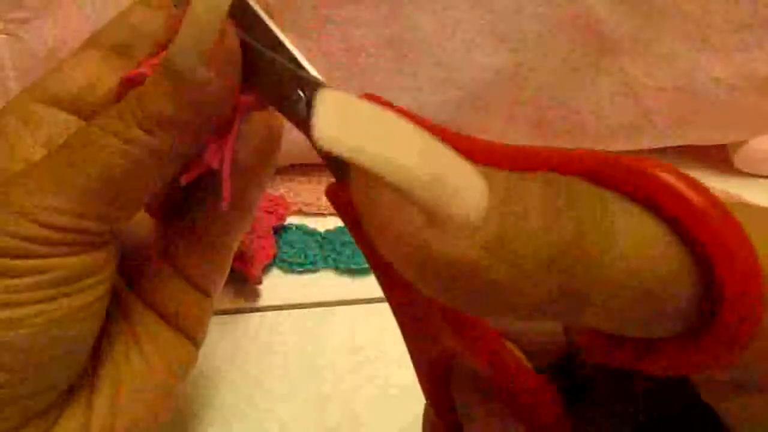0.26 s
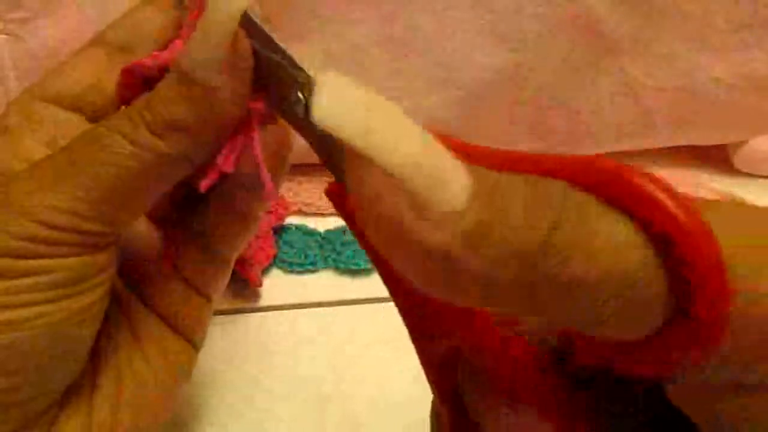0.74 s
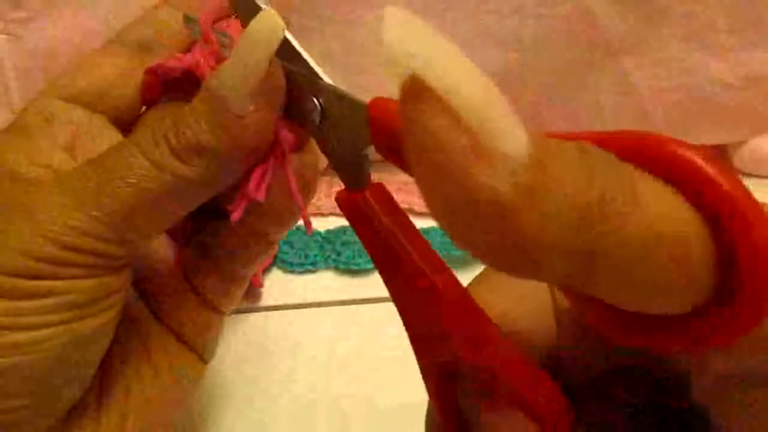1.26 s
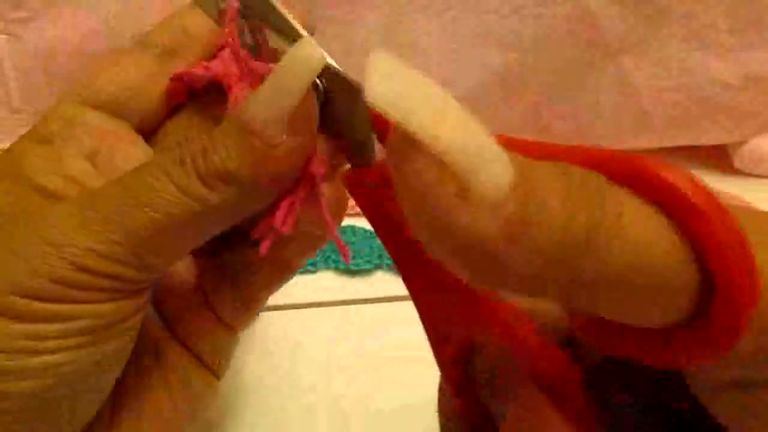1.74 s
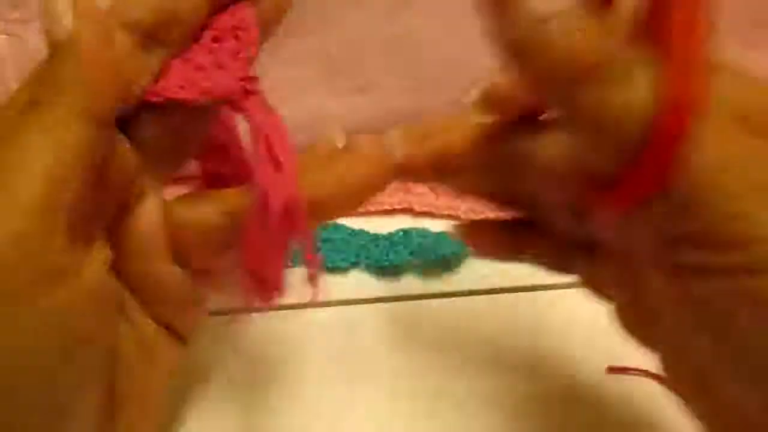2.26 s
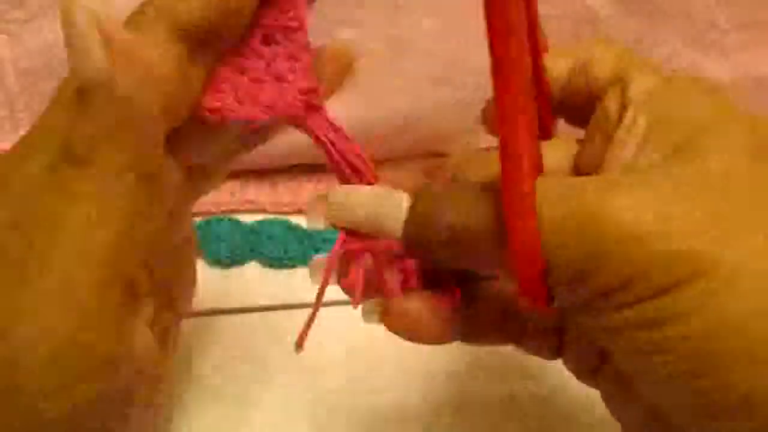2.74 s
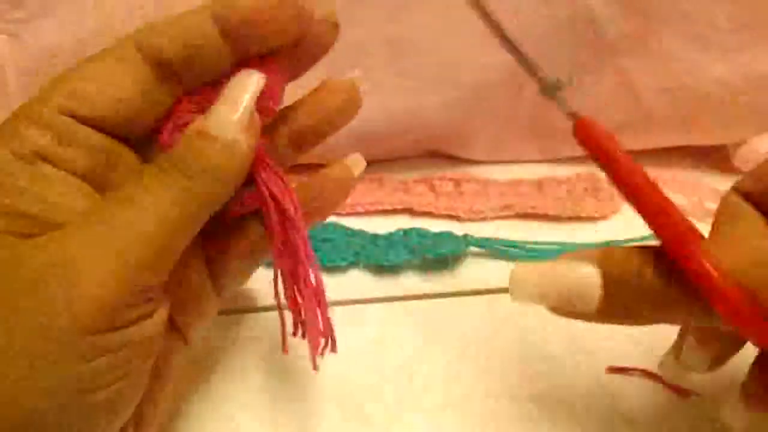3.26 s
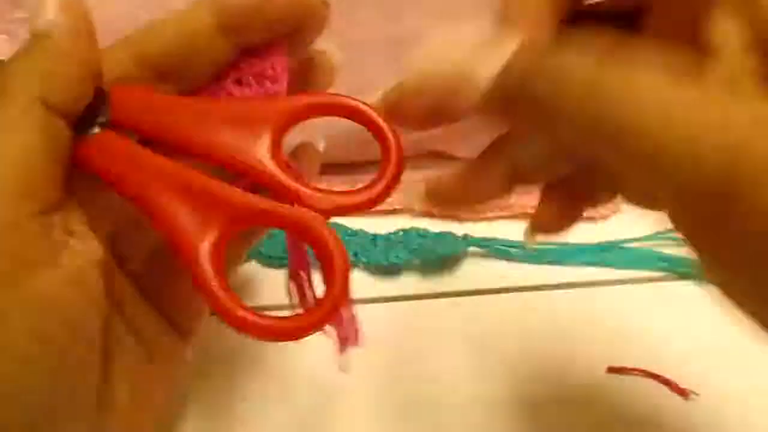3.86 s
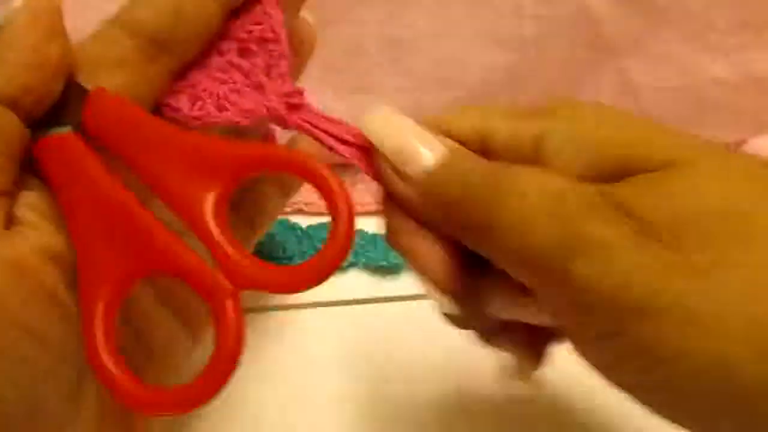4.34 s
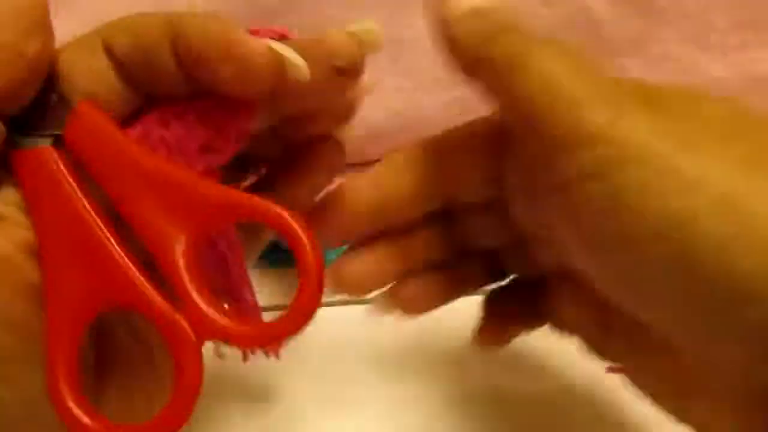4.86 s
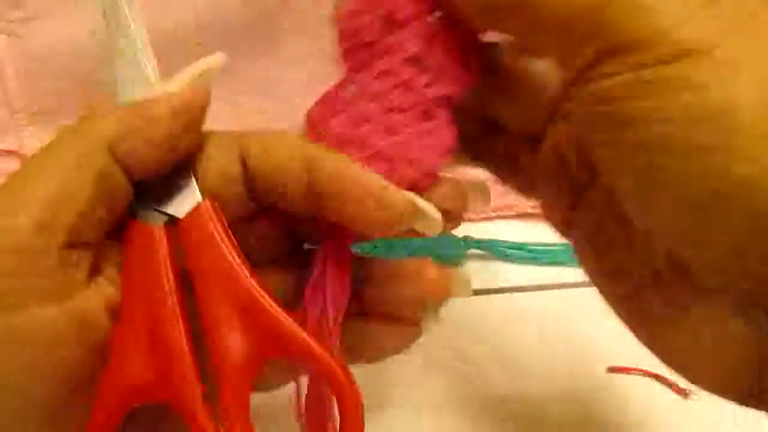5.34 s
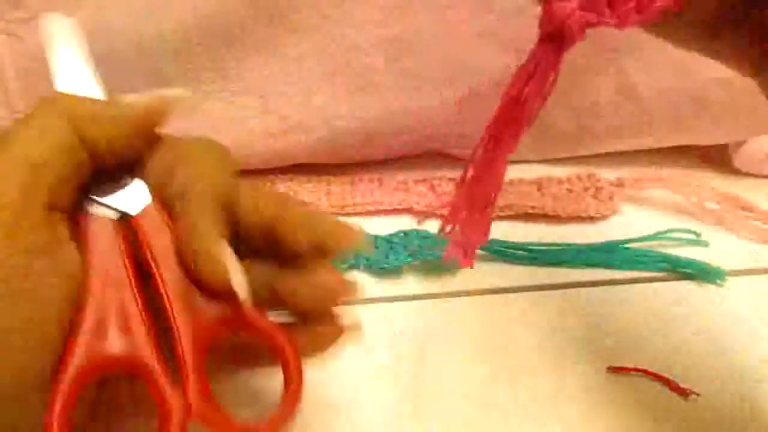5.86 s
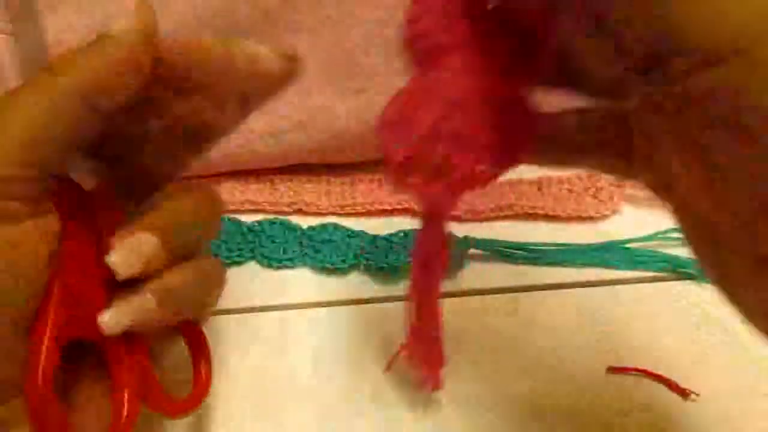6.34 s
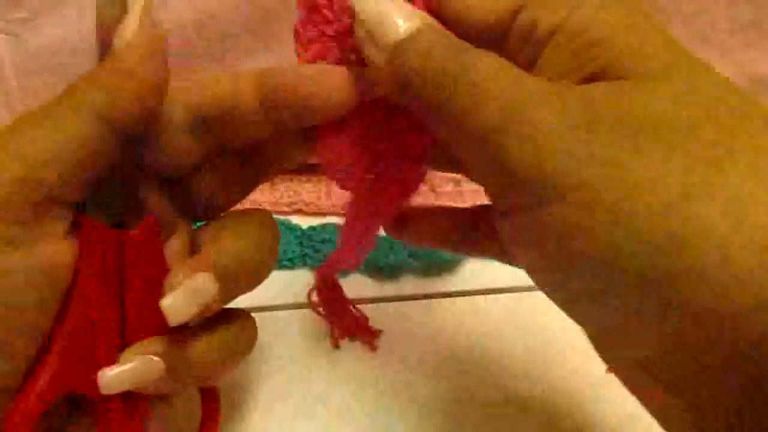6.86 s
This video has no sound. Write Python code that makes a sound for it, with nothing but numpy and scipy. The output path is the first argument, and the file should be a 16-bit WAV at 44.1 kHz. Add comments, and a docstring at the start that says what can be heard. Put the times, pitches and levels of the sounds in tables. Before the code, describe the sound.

A quiet, dry room with steady faint fan rumble, heard close in mono. A tiny nail tick on plastic comes at 0.2 s, faint scissor clicks at 0.4 and 0.6, and a very soft rasp near 0.8. A clear metallic click at 1.2 skids briefly; crisp, grainy snips through yarn follow at 1.4-1.6 and 1.8-1.95. Soft table bumps come around 1.9-2.25, faint tiny clicks at 2.6-2.9, and a light yarn rustle at 3.0. A dull thump at 3.4 leads to the loudest event, a sharp clack with a thud at 3.5, then clicks at 3.6 and another bright one at 4.0. Yarn swishes through fingers at 4.5-4.75, tightening, ending in a small click. Low thuds fall at 5.0 and 5.45, with faint rustling until 5.9. A low drone grows from about 5.6-6.2, and a last soft bump sounds at 6.7 before the hum continues to 7.1.

```python
"""A fan rumbles and whines faintly in a quiet room: steady noise, resonances and a low drone that swells late.
A fingernail taps a plastic handle and yarn slides between the fingers: ringing modes, and many tiny slips.
Small scissors click as they change hands, trim a yarn tassel with a rasp, and skid after hard contacts:
damped metal modes, and fibres snapping at random. Hands bump the table, which swings in its low modes."""
import sys
import numpy as np
from scipy import signal
from scipy.fft import rfft, irfft, next_fast_len
from scipy.io import wavfile

SR = 44100
rng = np.random.default_rng(int(sys.argv[2]) if len(sys.argv) > 2 else 0)


def wrap_up_sound(samples):
    """Save the sound to the file named by the first command line argument, as 16-bit audio."""
    columns = np.atleast_2d(samples).T
    # keep every value between -1 and 1, then stretch to whole-number steps
    tamed = np.clip(columns, -1, 1)
    steps = np.round(tamed * 32767).astype(np.int16)
    wavfile.write(sys.argv[1], SR, steps)


N = 313551
TIME = np.arange(N) / SR


def amp(db):
    """Turn decibels into a gain."""
    return 10 ** (np.asarray(db) / 20)


def unit(x):
    """Scale a sound to an average strength (rms) of 1."""
    return x / np.sqrt(np.mean(x ** 2) + 1e-20)


def filtered(x, response):
    """Make each frequency stronger or weaker by the gain that response gives for it."""
    m = next_fast_len(N + SR // 2)  # spare room, so the end does not wrap round to the start
    spectrum = rfft(x, m) * response(np.fft.rfftfreq(m, 1 / SR))
    return irfft(spectrum, m)[:N]


def coloured(x, points):
    """Shape a sound by (f/Hz, level/dB) points joined on a log frequency axis, at rms 1."""
    f, db = np.transpose(points)
    return unit(filtered(x, lambda hz: amp(np.interp(np.log(hz + 1), np.log(f), db))))


def narrow(centre_hz, width_hz):
    """Noise gathered round one resonance, at rms 1."""
    def response(hz):
        return 1 / (1 + ((hz - centre_hz) / width_hz * np.sqrt(2)) ** 2)
    return unit(filtered(rng.standard_normal(N), response))


def fibres(rate, spread_db):
    """Tiny slips at random moments, about rate a second, of uneven size and either direction."""
    happens = rng.random(N) < rate / SR
    direction = rng.choice([-1, 1], N)
    return happens * direction * amp(spread_db * rng.standard_normal(N))


def add(track, s, sound):
    """Mix a sound into the track at time s."""
    part = track[max(0, round(s * SR)):][:len(sound)]
    part += sound[:len(part)]


def swell(start, length, rise, fall):
    """Gain of one hand movement: it gathers speed smoothly, holds and lets go."""
    ramp = np.clip(np.minimum((TIME - start) / rise, (start + length - TIME) / fall), 0, 1)
    return np.sin(np.pi / 2 * ramp)


def struck(modes, tuning, attack, scatter_db):
    """Modes ring and die away after a hard contact; the whole is scaled to a fixed energy."""
    t = np.arange(SR // 25) / SR
    ring = np.zeros(len(t))
    for k, (hz, db, t60) in enumerate(modes):
        level_db = db + scatter_db * rng.standard_normal()
        fading = amp(level_db - 60 * t / t60)
        # neighbouring modes swing in opposite senses
        ring += (-1) ** k * fading * np.sin(2 * np.pi * hz * tuning * t)
    ring *= 1 - np.exp(-t / attack)
    return ring / np.sqrt(np.sum(ring ** 2) / (SR / 2000))  # same energy as 0.5 ms at rms 1


# colour of the room's steady noise: (f/Hz, relative level/dB per Hz)
ROOM_COLOUR = [(12, -35), (20, -5), (54, -11.5), (88, 1.5), (123, -4.5), (217, -8.5), (282, -7.5),
               (449, -17), (630, -19.5), (1110, -20.5), (1240, -23.5), (1560, -20.5), (1730, -25.5),
               (6840, -32.5), (9840, -41.5), (12800, -94), (21600, -120)]
# the fan's resonances: (f/Hz, width/Hz, level/dB rms)
FAN_RESONANCES = [(99, 23, -63.5), (286, 60, -66.5), (1067, 246, -69), (1547, 92, -65)]
# a low drone swelling: (t/s, level/dB)
DRONE_LEVEL = [(0, -82), (5.6, -69), (6.2, -55), (7.11, -54.5)]
ROOM_DB = -50.5  # base level of the room's even noise/dB; air_db raises or lowers it


def background(air_db=-1.0):
    """Even room noise, noise in the fan's resonances and a low drone that grows late."""
    air = amp(ROOM_DB + air_db) * coloured(rng.standard_normal(N), ROOM_COLOUR)
    fan = sum(amp(db) * narrow(hz, width) for hz, width, db in FAN_RESONANCES)
    drone_gain = amp(np.interp(TIME, *np.transpose(DRONE_LEVEL)))
    drone = drone_gain * narrow(centre_hz=273, width_hz=65)
    return air + fan + drone


# fingernails tapping the plastic handles: (nominal start t/s, relative level/dB)
NAIL_TAPS = [(0.196, -38), (4.461, -49.5), (5.273, -43.5)]
# ringing of a plastic handle: (f/Hz before tuning, relative level/dB, time to fade by 60 dB/s)
HANDLE_MODES = [(1000, -8, 0.0096), (1550, -3, 0.0081), (2080, 3.5, 0.0041), (2710, -2.5, 0.005)]


def taps(level_db=2, start_offset_s=0.00061):
    """A nail on plastic sets off a few quickly damped modes: a small dull tick."""
    track = np.zeros(N)
    for s, db in NAIL_TAPS:
        tick = struck(HANDLE_MODES, tuning=0.9, attack=.0001, scatter_db=0.5)
        add(track, s + start_offset_s, amp(db + level_db) * tick)  # a small shared delay
    return track


# yarn drawn through the fingers:
# (start t/s, length/s, release/s, relative rub level/dB, relative fizz level/dB)
YARN_PULLS = [(0.22, 0.055, .03, -73, -63), (0.37, 0.07, .02, -71, -65), (1.677, 0.085, .03, -64, -66),
              (2.788, 0.12, .06, -64, -62), (3.014, 0.15, 0.038, -59.5, -54.5),
              (3.27, 0.046, .03, -68, -66), (3.41, 0.031, 0.014, -53.5, -55),
              (3.446, 0.024, .008, -57, -66), (4.466, 0.275, .006, -48.5, -50.5),
              (4.76, 0.09, .03, -77, -67), (5.13, 0.1, .03, -67, -68), (5.269, 0.093, .05, -66, -62.5),
              (5.419, 0.24, 0.074, -62.5, -60.5), (5.628, 0.036, .015, -59, -58.5),
              (5.644, 0.23, 0.051, -70, -67)]
# how firmly the fingers hold the yarn: (t/s, firmness 0-1)
GRIP_FIRMNESS = [(4.52, 0.35), (4.58, 0.4), (4.63, 0.95), (4.7, 0.9), (4.74, 0.5), (4.9, .2)]
# rub of a lightly held strand: (f/Hz, relative level/dB per Hz)
LIGHT_RUB_COLOUR = [(1200, -22), (2400, -8), (3200, -5.5), (4200, -12.5), (5100, -1), (5900, -4),
                    (7000, -6), (10000, -24)]
# rub of a firmly gripped strand: (f/Hz, relative level/dB per Hz)
FIRM_RUB_COLOUR = [(1200, -30), (2500, -17), (3100, 0.5), (4000, -2), (4700, 0.5), (5800, -6.5),
                   (7000, -18), (10000, -25)]
# fizz of loose fibres: (f/Hz, relative level/dB per Hz)
FIZZ_COLOUR = [(2500, -20), (5500, -8), (6900, 2.5), (7600, 2), (8500, -4.5), (9300, -0.5), (10000, -16)]
PULL_RISE = 0.43  # share of a pull's length spent gathering speed
GRIP_MUTES_DB = -7.5  # a full grip holds the loose fibres still


def yarn(rub_db=-1, fizz_db=0, speed_power=1.25):
    """Strands slide over skin: a rub that deepens as the grip tightens, and a fine fizz of loose fibres."""
    grip = np.clip(np.interp(TIME, *np.transpose(GRIP_FIRMNESS)), 0, 1)
    rubbing, fizzing = np.zeros((2, N))
    for s, length, release, pull_rub_db, pull_fizz_db in YARN_PULLS:
        friction = swell(s, length, PULL_RISE * length, release) ** speed_power
        rubbing += amp(pull_rub_db + rub_db) * friction
        fizzing += amp(pull_fizz_db + fizz_db) * friction
    light = coloured(fibres(rate=8000, spread_db=4), LIGHT_RUB_COLOUR)
    firm = coloured(fibres(rate=8000, spread_db=4), FIRM_RUB_COLOUR)
    # square roots keep the power steady while one rub blends into the other
    rub = rubbing * (np.sqrt(1 - grip) * light + np.sqrt(grip) * firm)
    loose = coloured(fibres(rate=6000, spread_db=4.5), FIZZ_COLOUR)
    fizz = fizzing * amp(GRIP_MUTES_DB * grip) * loose
    return rub + fizz


# two parts of the scissors meeting: (nominal start t/s, relative level/dB, brightness/dB per octave,
# f/Hz favoured by each part, tuning factor under the grip)
CONTACTS = [(0.421, -47.5, -4, (3900, 6300), 1), (0.5854, -49, -5, (3100, 4400), 0.94),
            (1.1915, -30.5, -5.5, (3900, 7400), 1.06), (1.4037, -42, -7, (3800, 7200), 1.0),
            (1.8008, -43, -5, (4200, 7200), 0.96), (2.6087, -46, -1, (2200, 6700), 1.0),
            (2.6326, -39.5, 3, (5600, 6600), 0.99), (2.6359, -42, 5, (3100, 6300), 1.0),
            (2.6671, -41.5, 1, (6600, 6900), 0.98), (2.871, -43, -2, (3100, 6200), 0.956),
            (3.3285, -40, 3, (2800, 6200), 0.98), (3.3317, -44, 1, (4400, 7000), 1),
            (3.368, -44.5, -3, (3500, 6200), .95), (3.446, -38, -3, (6100, 6200), 1.0),
            (3.5155, -16.5, -3.5, (2435, 6560), .98), (3.6051, -29, -0.5, (2860, 8700), 1.01),
            (3.6396, -26.5, -3.5, (2300, 6250), 0.99), (4.0129, -25, -5, (3640, 4900), 0.98),
            (4.7337, -42, -3, (2200, 8200), 0.88)]
# the scissors, damped by the hand: (f/Hz before tuning, relative level/dB, time to fade by 60 dB/s)
SCISSOR_MODES = [(1530, -4, 0.0051), (2215, -1, 0.0057), (2540, -0.5, 0.0081), (3180, 2, 0.011),
                 (3950, 2.5, 0.0043), (4370, -1.5, 0.011), (5470, 3.5, 0.0068), (6220, -2.5, 0.015),
                 (7160, 3.5, 0.0065), (8440, 0, 0.0083), (8540, 4.5, 0.011), (10300, 5, 0.0039)]
# how much and how widely the point of contact favours some modes
FOCUS_DB, FOCUS_OCTAVES = 8.5, 0.21


def clicks(level_db=0, start_offset_s=.0005, chatter_db=-14):
    """Each contact rings the scissors for a few ms; where it lands decides which modes speak."""
    track = np.zeros(N)
    for s, db, bright_db, favoured_hz, tuning in CONTACTS:
        modes = []
        for hz, level, t60 in SCISSOR_MODES:
            octaves = np.log2(hz / np.array(favoured_hz))
            nearness = np.exp(-(octaves / FOCUS_OCTAVES) ** 2).sum()
            mode_db = level + bright_db * octaves[0] + FOCUS_DB * nearness
            modes.append((hz, mode_db, t60))
        click = amp(db + level_db) * struck(modes, tuning, attack=.00005, scatter_db=1.5)
        add(track, s + start_offset_s, click)
        # the parts touch once more as they settle
        settle = rng.uniform(.0008, .002)
        add(track, s + start_offset_s + settle, amp(chatter_db) * click)
    return track


# the blades closing on the yarn: (start t/s, length/s, relative rasp level/dB)
BLADE_STROKES = [(0.763, 0.23, -62), (1.404, 0.218, -51.5), (1.815, 0.13, -48.5)]
# strands parting between the blades: (start t/s, relative level/dB)
PARTING_STRANDS = [(0.8245, -42), (0.869, -41), (0.899, -41), (1.428, -39.5), (1.484, -41.5), (1.504, -36),
                   (1.518, -31.5), (1.594, -36.5), (1.832, -38.5), (1.858, -35.5), (1.869, -31),
                   (1.886, -34), (1.9067, -32)]
# the blades' resonances while they shear: (f/Hz, relative level/dB per Hz)
SHEAR_COLOUR = [(1000, -28), (1800, -18), (2300, -7), (3000, -10.5), (3450, -3.5), (3860, -0.5),
                (4400, -6.5), (5200, -19.5), (6200, -10.5), (6550, -14), (7000, -4.5), (8200, -15.5),
                (9200, -18), (10000, -16.5)]
STROKE_RISE_S, STROKE_FALL_S = 0.014, 0.027  # the edges bite, then run out of the yarn
STRAND_S = .015  # time that one strand takes to part


def cutting(rasp_db=-2, strand_db=-11, body_db=-9):
    """Fibres snap one by one between the edges, in a fuller burst whenever a whole strand parts."""
    closing = sum(amp(db) * swell(s, length, STROKE_RISE_S, STROKE_FALL_S)
                  for s, length, db in BLADE_STROKES)
    rasp = amp(rasp_db) * closing * coloured(fibres(rate=3500, spread_db=3.0), SHEAR_COLOUR)
    parting = np.zeros(N)
    burst = np.sin(np.linspace(0, np.pi, round(STRAND_S * SR)))  # rises and falls once
    for s, db in PARTING_STRANDS:
        add(parting, s, amp(db + strand_db) * burst)
    snapping = coloured(fibres(rate=4000, spread_db=3), SHEAR_COLOUR)
    body = amp(body_db) * narrow(centre_hz=2620, width_hz=900)
    return rasp + parting * (snapping + body)


# the blades skidding on after a hard contact: (t/s, starting level/dB, time to fade by 60 dB/s)
BLADE_SKIDS = [(1.196, -55.5, .3), (3.519, -55.5, 0.25), (4.015, -56, 0.31)]
# colour of the skidding: (f/Hz, relative level/dB per Hz)
SKID_COLOUR = [(1200, -20), (2600, 1), (4200, -5.5), (5500, -2), (7200, -0.5), (8500, -10), (10000, -22)]


def skids():
    """After a hard contact the blades scrape on smoothly over each other, fading away."""
    sliding, t = np.zeros(N), np.arange(SR // 4) / SR
    for s, db, t60 in BLADE_SKIDS:
        add(sliding, s, amp(db - 60 * t / t60))
    return sliding * coloured(fibres(rate=3500, spread_db=4), SKID_COLOUR)


# hands bumping the table: (nominal start t/s, relative peak level/dB, hardness/dB)
HAND_BUMPS = [(1.921, -41.5, -23), (2.149, -36, -1.5), (2.157, -36.5, -2), (2.23, -34, -15),
              (2.241, -36, -24), (3.396, -27, -20.5), (3.522, -21, -10.5), (3.795, -35.5, -24),
              (4.965, -36, -19), (4.994, -25, -16.5), (5.449, -28.5, -26), (5.703, -37, -27),
              (5.712, -38, -25), (5.781, -37, -18), (6.682, -24.5, -20)]
# how the table top swings: (f/Hz, relative level/dB, time to fade by 60 dB/s)
TABLE_MODES = [(97.4, 1, 0.13), (120.5, 3.5, 0.099), (150, -1, 0.096), (195.6, -4, 0.14),
               (270.4, -6.5, 0.098), (407, -9, 0.051), (559, -18, 0.041)]


def bumps(level_db=-1, attack=0.0022, neutral_db=-14, hardening=0.54, start_offset_s=0.00054, low_hz=80):
    """Soft blows set the table top swinging; harder ones reach its upper modes."""
    track, t = np.zeros(N), np.arange(SR // 4) / SR
    radiation = signal.butter(N=4, Wn=low_hz, btype="high", fs=SR, output="sos")
    lowest_hz = TABLE_MODES[0][0]
    for s, db, hard_db in HAND_BUMPS:
        tilt_db = hardening * (hard_db - neutral_db)  # per octave
        swing = np.zeros(len(t))
        for hz, level, t60 in TABLE_MODES:
            mode_db = level + rng.normal(0, 1) + tilt_db * np.log2(hz / lowest_hz)
            swing += amp(mode_db - 60 * t / t60) * np.sin(2 * np.pi * hz * t)
        swing *= 1 - np.exp(-t / attack)
        thud = signal.sosfilt(radiation, swing)  # the board radiates little below its first mode
        add(track, s + start_offset_s, amp(db + level_db) * thud / np.abs(thud).max())
    return track


def room(x, t60=0.045, wet_db=-20):
    """Soft furnishings send back a faint, short answer made of fading noise."""
    t = np.arange(SR // 3) / SR
    tail = rng.standard_normal(len(t)) * amp(-60 * t / t60) * (t > .003)
    answer = signal.fftconvolve(x, tail / np.linalg.norm(tail))[:N]
    return x + amp(wet_db) * answer


def scene():
    """Scissors and yarn near the microphone, the table under it, the room around."""
    close = cutting() + clicks() + skids() + taps() + yarn()
    mono = room(close) + bumps() + background()
    return mono[None]  # one channel


# the sound's overall colour, a narrow notch and less treble near 10 kHz: (f/Hz, level/dB)
OVERALL_COLOUR = [(7650, 0), (7900, -3.5), (8150, 2.5), (8900, -1.5), (10000, -7.5)]
TOP_HZ = 10050  # middle of the 200 Hz wide upper edge


def record(dry):
    """Give the whole sound its overall colour, then let nothing through above the band limit."""
    def response(hz):
        band = np.clip((TOP_HZ - hz) / 200 + .5, 0, 1)
        return amp(np.interp(hz, *np.transpose(OVERALL_COLOUR))) * band
    return np.array([filtered(channel, response) for channel in dry])


dry = scene()
out = record(dry)
wrap_up_sound(out)
```